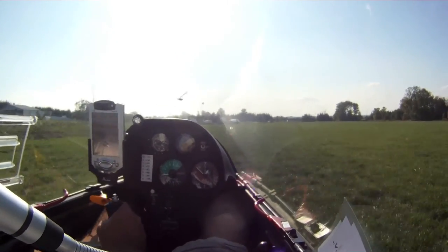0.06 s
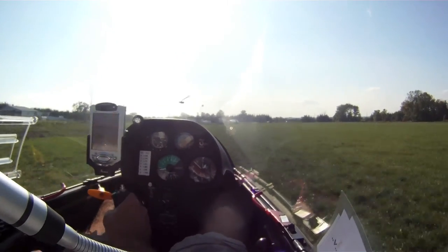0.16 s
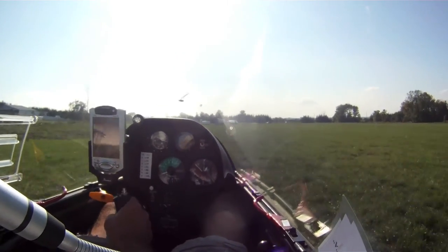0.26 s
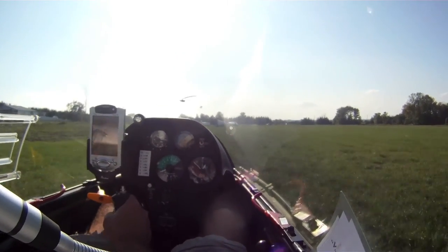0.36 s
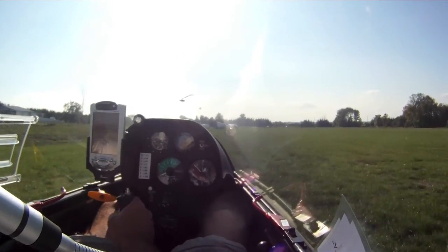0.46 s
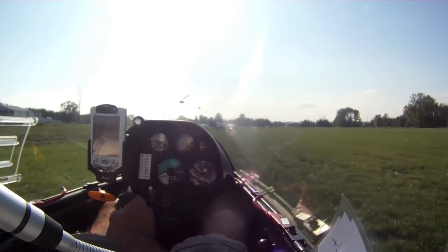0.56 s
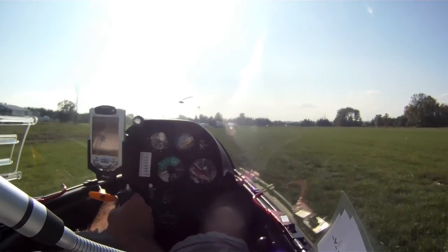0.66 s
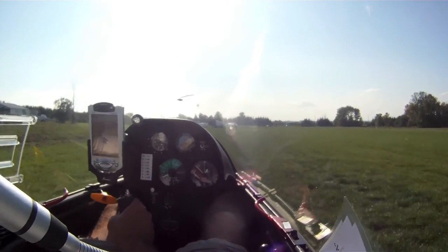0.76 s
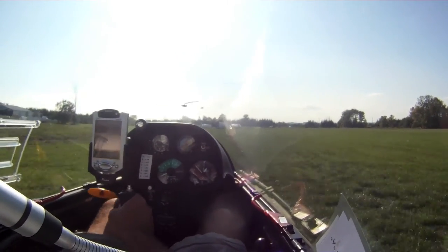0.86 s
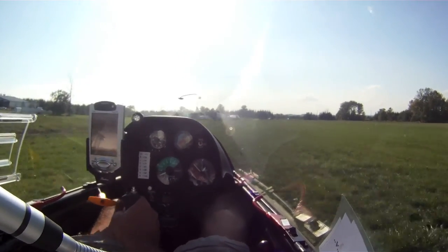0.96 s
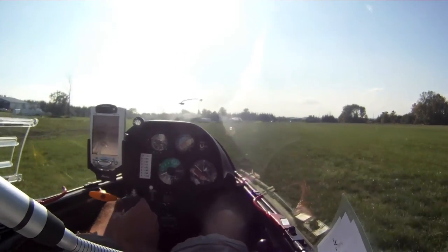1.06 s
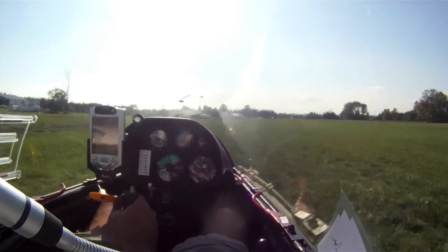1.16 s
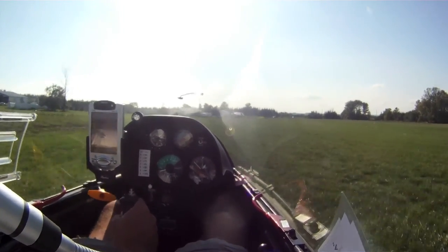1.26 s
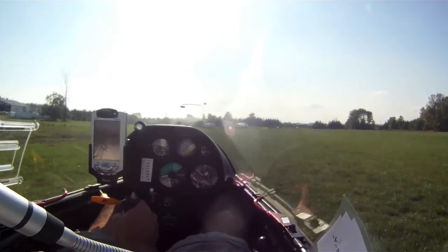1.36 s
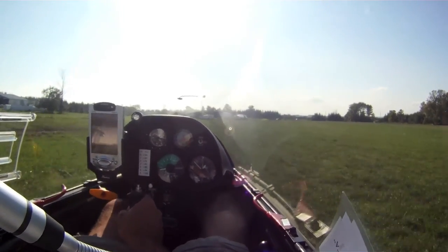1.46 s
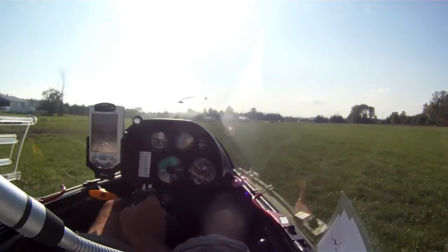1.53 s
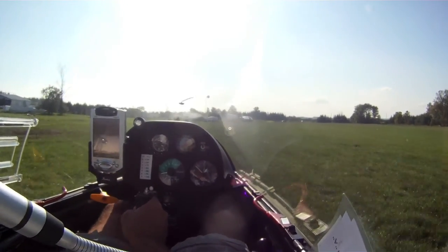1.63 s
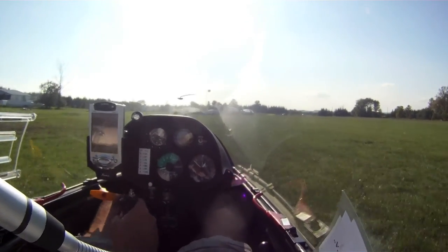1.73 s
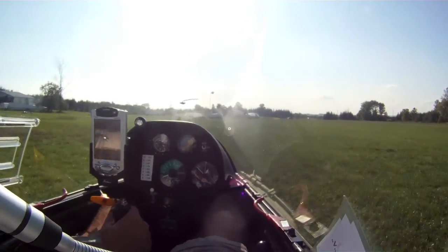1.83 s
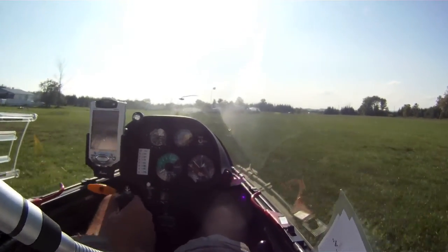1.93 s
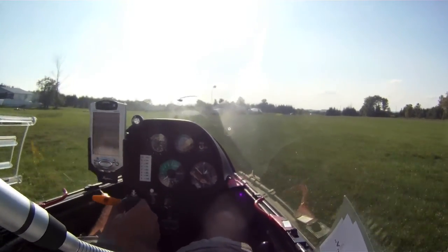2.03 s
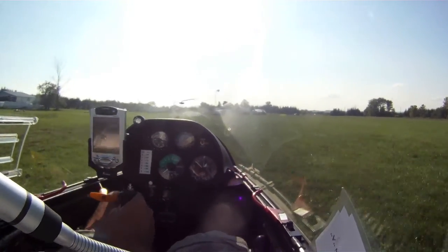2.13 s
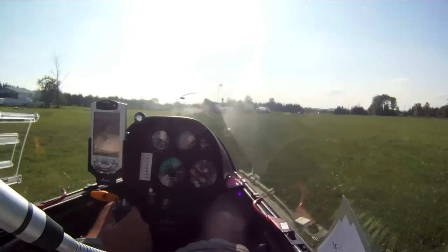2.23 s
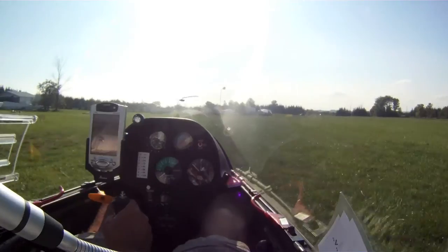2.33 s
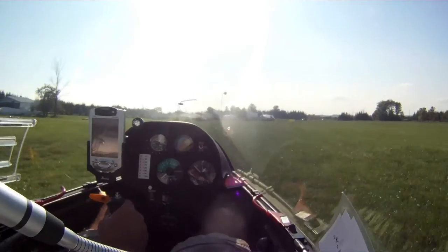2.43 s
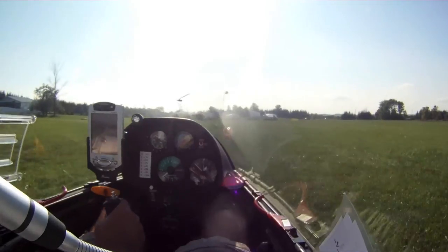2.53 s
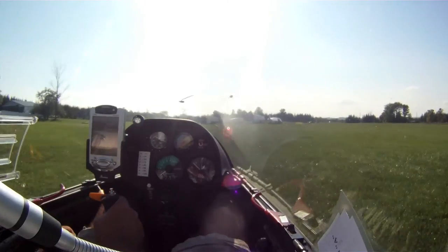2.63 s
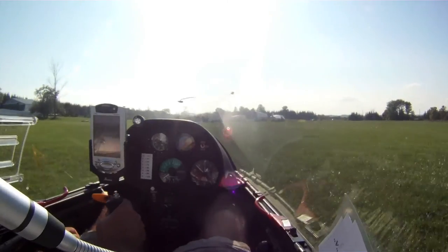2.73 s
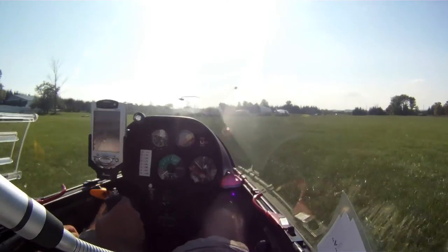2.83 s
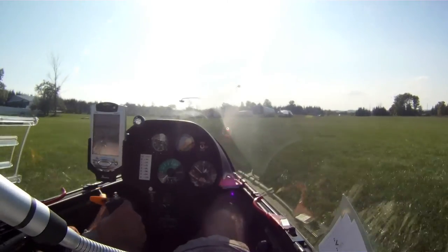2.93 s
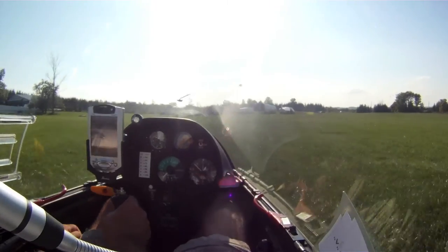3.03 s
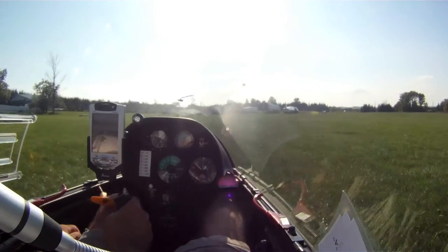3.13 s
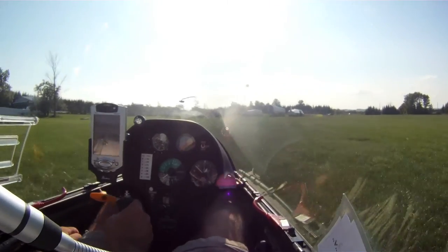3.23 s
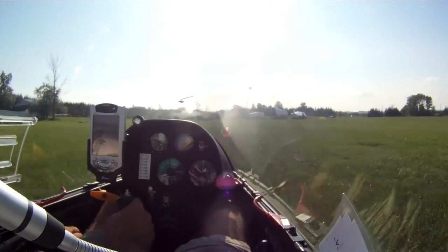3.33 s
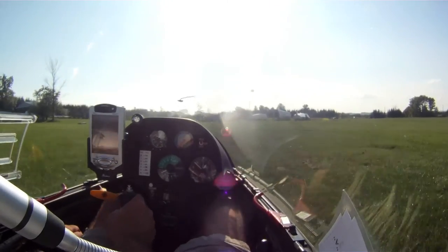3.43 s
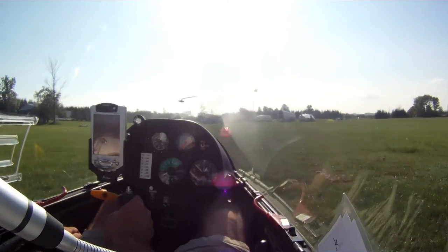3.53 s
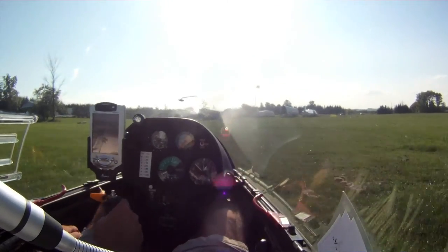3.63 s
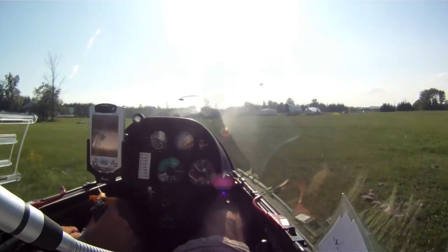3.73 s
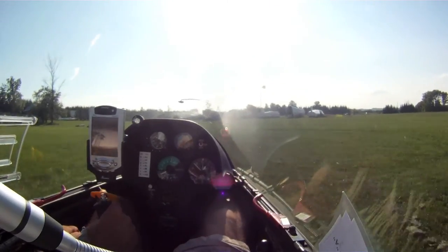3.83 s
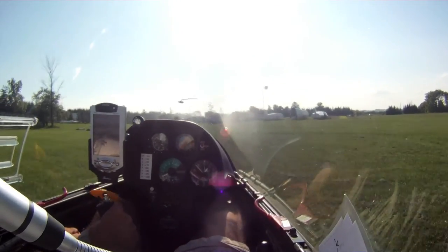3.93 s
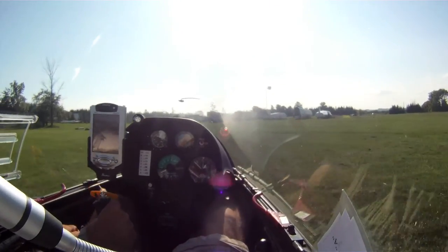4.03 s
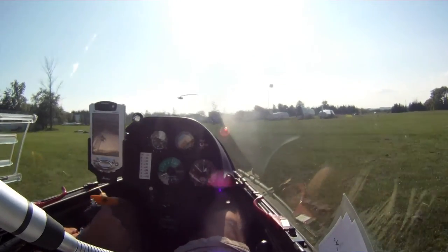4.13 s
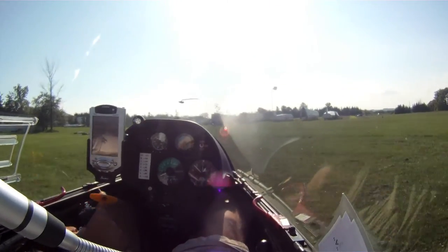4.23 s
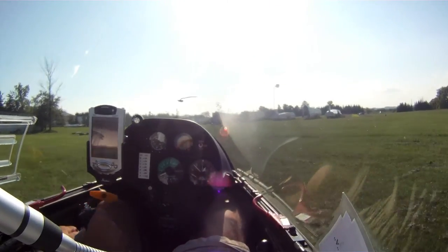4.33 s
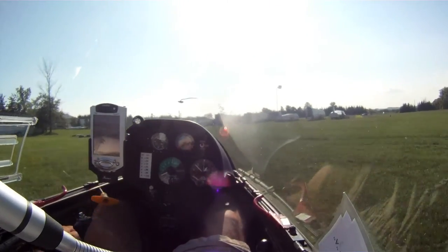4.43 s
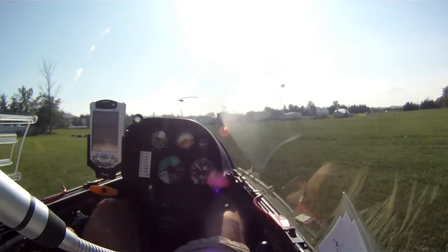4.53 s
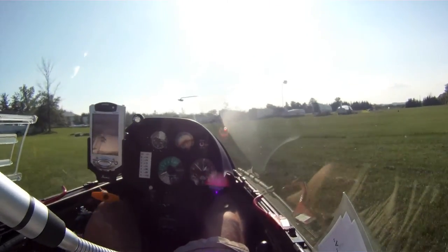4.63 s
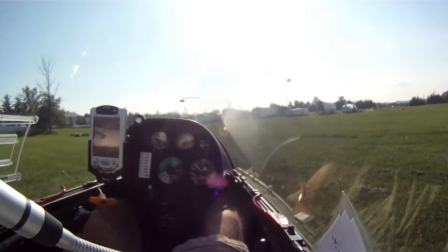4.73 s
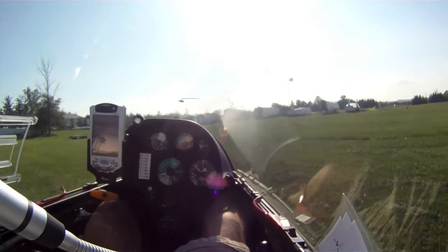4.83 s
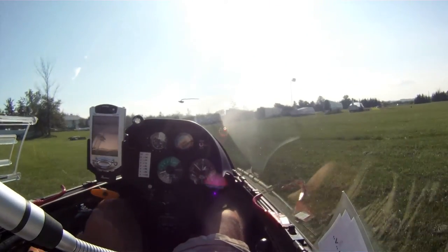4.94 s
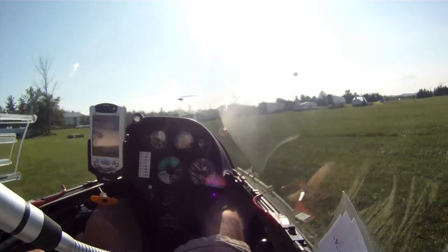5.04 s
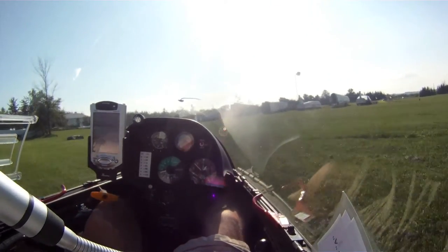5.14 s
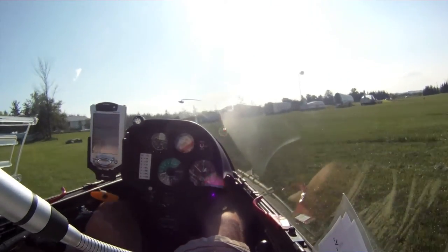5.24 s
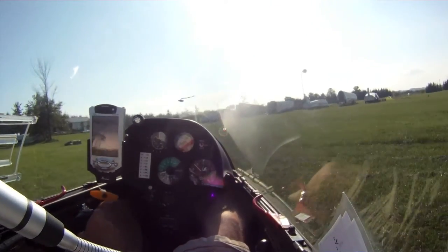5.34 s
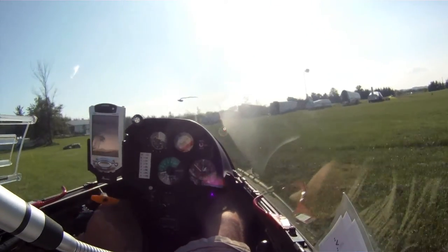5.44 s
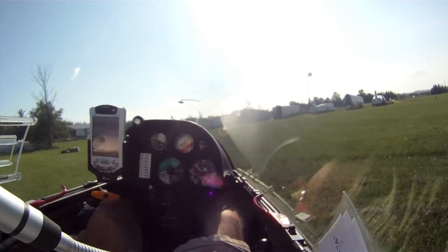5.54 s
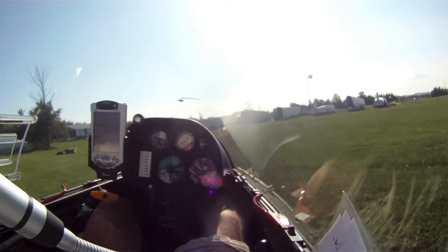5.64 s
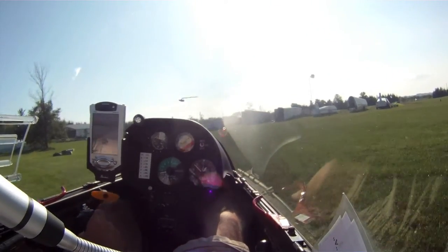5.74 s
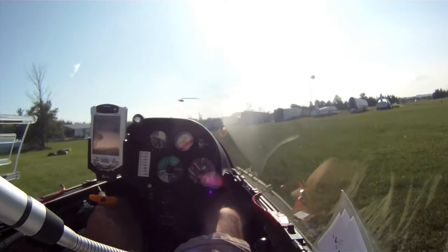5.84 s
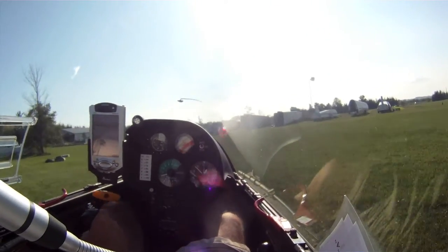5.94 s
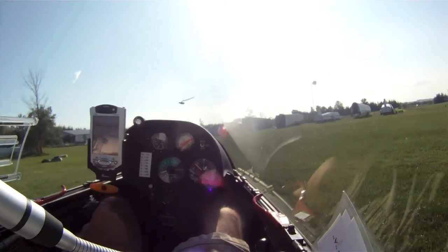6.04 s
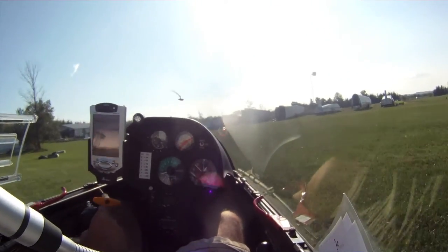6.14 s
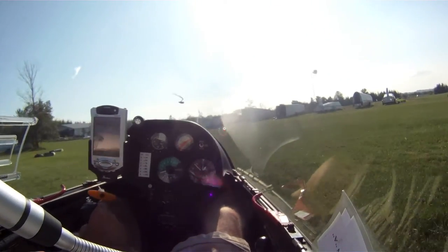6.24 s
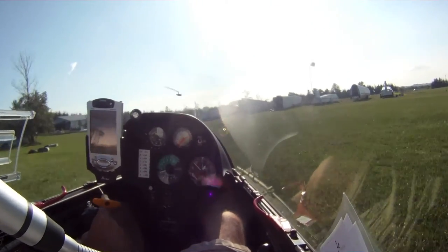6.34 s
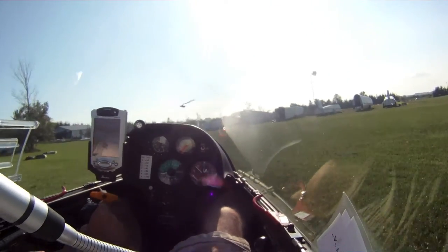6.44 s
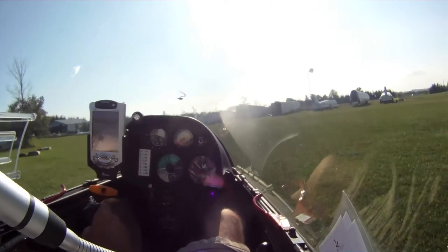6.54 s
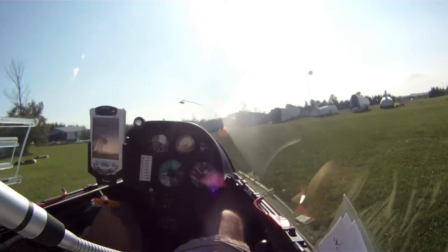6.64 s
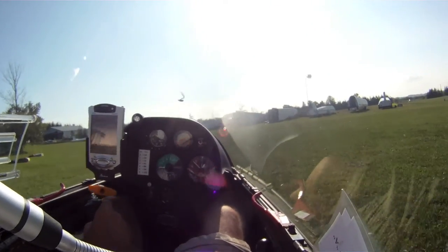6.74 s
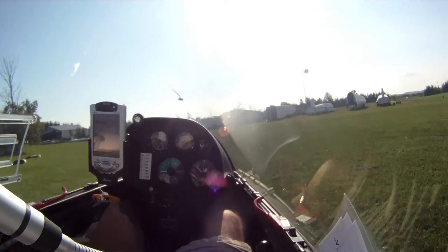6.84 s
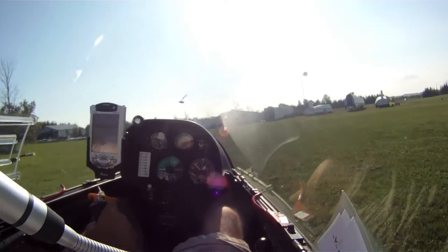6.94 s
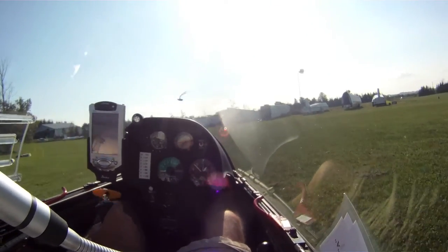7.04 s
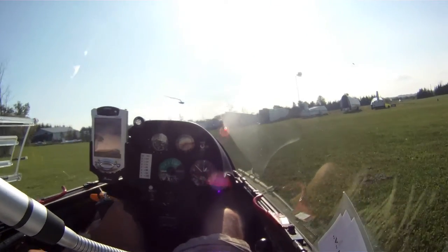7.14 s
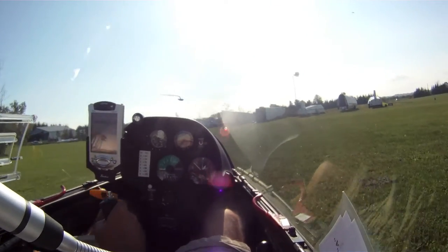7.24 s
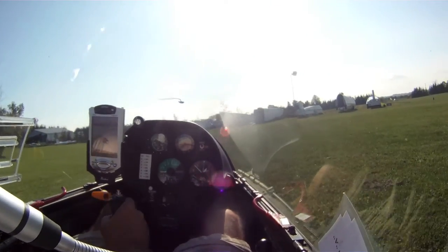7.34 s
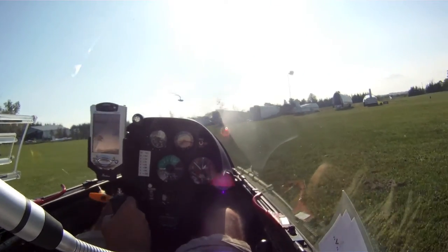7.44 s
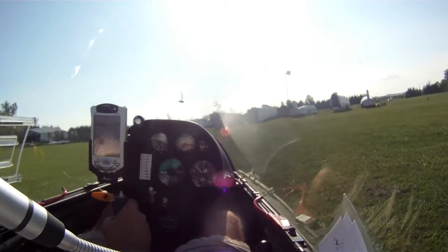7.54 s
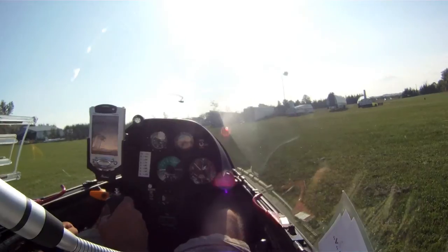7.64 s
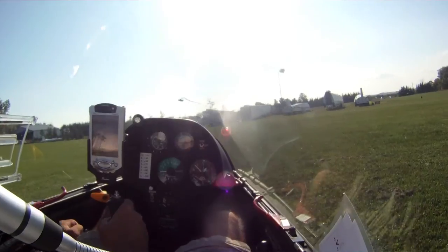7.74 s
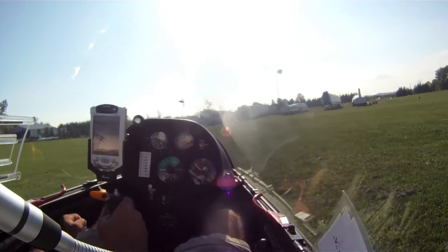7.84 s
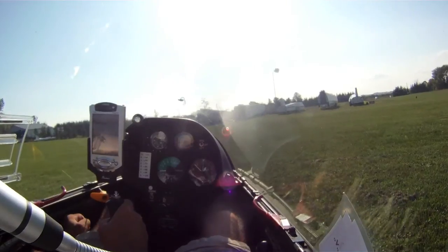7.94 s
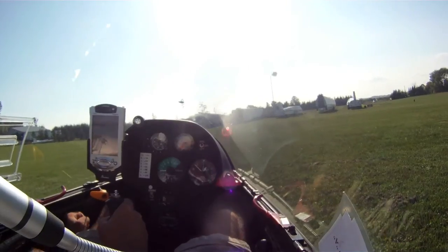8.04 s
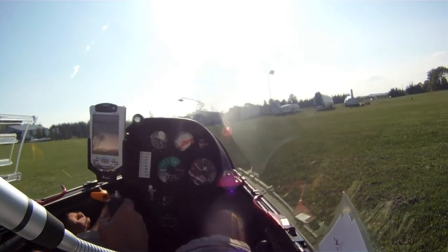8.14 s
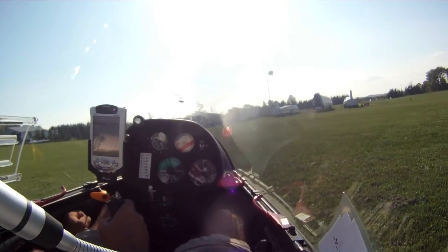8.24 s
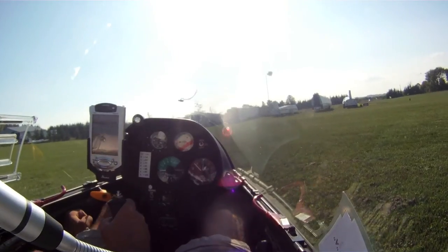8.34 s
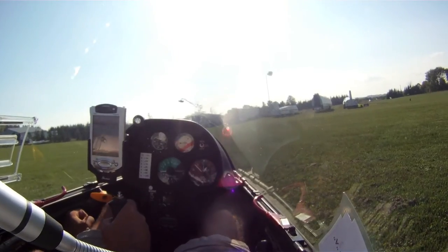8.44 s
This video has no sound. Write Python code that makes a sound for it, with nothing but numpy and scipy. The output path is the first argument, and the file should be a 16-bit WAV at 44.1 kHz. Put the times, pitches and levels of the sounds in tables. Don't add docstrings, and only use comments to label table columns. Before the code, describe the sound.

Close, muffled and dry inside a glider cockpit rolling over grass, through a small camera in a closed case on the airframe. From 0 to 2.5 seconds a low, uneven hull boom throbs quickly over turf rumble, with heavy wheel thumps, hollow panel rattles, small bright pings and chattering ticks; an especially hard crack and jolt land near 1.9. From 2.5 to 5 the rumble eases but the boom keeps swelling, panel knocks and loose ticks stand out, with a thump near 4.2. A sharp clack comes at 5.1. The boom then sinks and ticks fall into short regular runs as the wing rocks. At 6.3 to 6.6 the wingtip judders rapidly, slowing and weakening. After 7 the rumble nearly vanishes; faint grass brushing fades, and isolated soft knocks and creaks around 7.5, 8.0 and 8.4 close it.

```python
import sys
import numpy as np
from scipy import signal
from scipy.fft import rfft, irfft, next_fast_len
from scipy.io import wavfile
from scipy.ndimage import uniform_filter1d

SR = 44100
rng = np.random.default_rng(int(sys.argv[2]) if len(sys.argv) > 2 else 0)


def waveform_to_disk(signal):
    frames = np.transpose(np.atleast_2d(signal))
    scaled = np.clip(frames, -1, 1) * 32767
    samples = np.round(scaled).astype(np.int16)
    wavfile.write(sys.argv[1], SR, samples)


def attenuation_scalar(level_db):
    decades = np.asarray(level_db, float) / 20
    return 10 ** decades


N = 374409
TIME = np.arange(N) / SR


def level(x, db=0):
    return x * attenuation_scalar(db) / np.sqrt(np.mean(x ** 2))


def curve(table):
    return np.interp(TIME, *np.transpose(table))


def walk(rate_hz):
    hold = int(SR / rate_hz)
    steps = np.repeat(rng.standard_normal(N // hold + 1), hold)
    return level(uniform_filter1d(uniform_filter1d(steps, hold), hold)[:N])


def coloured(spectrum):
    hz, db = np.transpose(spectrum)
    size = next_fast_len(N)
    bins_hz = np.arange(1, size // 2 + 2) * SR / size
    gain = attenuation_scalar(np.interp(np.log(bins_hz), np.log(hz), db))
    return level(irfft(rfft(rng.standard_normal(size)) * gain, size)[:N])


def ring(x, modes):
    out = 0
    for k, (hz, width_hz, db) in enumerate(modes):
        b, a = signal.iirpeak(hz, hz / width_hz, SR)
        out = out + (-1) ** k * attenuation_scalar(db) * signal.lfilter(b, a, x)
    return out


def bursts(starts, peaks_db, fades_s, rise_s):
    out = np.zeros(N)
    for s, db, fade in np.broadcast(starts, peaks_db, fades_s):
        t = np.arange(int(max(fade, 1e-3) * SR)) / SR
        i = int(s * SR)
        blow = attenuation_scalar(db - 60 * t / fade) * (1 - np.exp(-t / rise_s))
        out[i:i + len(t)] += blow[:N - i]
    return out


def struck(envelope, modes, starts=(), peaks_db=()):
    noise = rng.standard_normal(N)
    blows = np.zeros(N)
    blows[(np.asarray(starts) * SR).astype(int)] = attenuation_scalar(peaks_db)
    one_blow = ring(np.arange(4000) == 0, modes)
    shaking = envelope * noise / np.std(ring(noise[:SR], modes))
    return ring(shaking + blows / np.abs(one_blow).max(), modes)


def swells(rest_db, crests, peaks_db, builds_s, fades_s):
    coarse = TIME[::64]
    t = coarse[:, None] - crests
    drop_db = 20 * np.where(t < 0, -t / builds_s, t / fades_s)
    power = attenuation_scalar(2 * (peaks_db - drop_db)).sum(axis=1)
    return 10 * np.log10(np.interp(TIME, coarse, power) + attenuation_scalar(2 * rest_db))


# start_s, speed_m_s
SPEED = [(0, 9), (1.0, 8), (2.1, 8), (3.0, 5), (4.0, 4), (5.0, 3.2), (6.2, 2.2), (7.0, 1.8), (7.45, .9),
         (8.05, .7), (8.25, .3), (8.49, .22)]


def follow_speed(full_db, exponent):
    return full_db + exponent * 20 * np.log10(curve(SPEED) / 9)


def patchy(rest_db, patches):
    s, db, fade_s = patches
    return swells(rest_db, s, db, fade_s, fade_s)


# pitch_hz, level_db
FLOOR = [(35, -31), (60, -1), (117, -7), (323, -27), (473, -26), (925, -13), (1230, -37), (2230, -35),
         (5800, -48), (7540, -78), (12800, -120)]


def still_air():
    return coloured(FLOOR) * attenuation_scalar(-71)


# pitch_hz, level_db
SWISH = [(650, -20.5), (1100, 1), (1180, -8), (1270, 5.5), (1770, -33.5), (2030, -7), (2330, -7.5),
         (3060, -25), (3720, -1), (4150, -17.5), (4710, -10), (5410, -16), (5800, -22.5), (7540, -57),
         (12800, -120)]
# start_s, level_db
ROLLING = [
    (0, 0),
    (7.75, 0),
    (8.1, -14),
    (8.49, -25),
]


def grass(rolling, loose_db):
    brush_db = np.maximum(loose_db, -74) - 11 + 2.5 * walk(120)
    return rolling * coloured(SWISH) * attenuation_scalar(brush_db)


# pitch_hz, width_hz, level_db
SWAY = [(31.5, 9.43, 2), (56, 15, -8.5)]
# start_s, level_db, fade_s (20 dB either side)
DIPS = [(0.17, -47, .4), (0.8, -45, .35), (1.15, -52, .7), (1.88, -38, .3), (2.3, -40, .5), (2.75, -45, .9),
        (3.3, -48, .9), (3.98, -53, .8), (4.8, -52, .6), (5.65, -49, .7), (6.55, -48, .5), (8.05, -61, .3)]


def suspension():
    sway_db = patchy(follow_speed(-51, .75), np.transpose(DIPS)) + 1.5 * walk(5)
    return struck(attenuation_scalar(sway_db), SWAY)


# pitch_hz, level_db
TURF = [(56, -33.5), (95, -3), (129, -1), (265, -19), (344, -23.5), (461, -22.5), (520, -21.5), (680, -49),
        (1140, -120)]
# start_s, fade_s (20 dB either side), rattle_db of panels, rumble_db of turf
PATCHES = [(0.0, .4, -51, -44), (0.42, .3, -50, -53), (0.8, .3, -48.5, -43), (1.05, .6, -54, -50),
           (1.5, .6, -53, -46), (1.25, .3, -58, -47), (1.72, .4, -60, -46.5), (1.92, .25, -62, -46.5),
           (2.08, .15, -55, -46.5), (2.38, .3, -54.5, -56), (2.47, .1, -58, -53), (2.64, .2, -49.5, -59),
           (2.75, .6, -54, -51), (3.2, .8, -60, -51), (3.51, .3, -49, -50.5), (3.65, .5, -52, -57),
           (4.16, .18, -47.5, -56), (4.47, .3, -51, -53), (4.65, .7, -52.5, -57), (4.91, .7, -56.5, -62),
           (5.15, .3, -58, -53), (5.29, .4, -56, -58), (5.64, .4, -55.5, -55), (6.03, .4, -53.5, -60),
           (6.33, .4, -63, -52), (6.8, .35, -57, -59), (7.0, .3, -62, -57), (7.25, .4, -62, -62),
           (7.59, .5, -65, -68), (7.97, .3, -68, -61), (0.66, .2, -52, -62), (1.85, .15, -55, -52),
           (6.45, .2, -57, -60), (3.45, .2, -58, -51)]


def rough_turf():
    s, fade_s, panel_db, ground_db = np.transpose(PATCHES)
    rattle_db = patchy(follow_speed(-62, .6), (s, panel_db, fade_s))
    turf_db = patchy(follow_speed(-56.5, 1.05), (s, ground_db, fade_s))
    return coloured(TURF) * attenuation_scalar(turf_db + 2.6 * walk(25)), rattle_db


# start_s, level_db
SLACK = [(0, 0), (.9, -1.5), (1.9, -1.5), (2.35, 2.5), (2.75, -1), (2.92, 4.5), (3.15, 0), (3.35, 4),
         (3.7, 1.5), (3.85, 4), (4.05, .5), (5.05, -2), (5.22, 3), (5.45, -1), (6.05, -1.5), (6.27, 3),
         (6.45, -1.5), (7.3, -2)]


def looseness(boom_db, rattle_db):
    from_boom = .5 * (np.maximum(boom_db, -55) + 42)
    from_rattle = .15 * (rattle_db + 55)
    return follow_speed(-66.5, .42) + from_boom + from_rattle + curve(SLACK)


# start_s, length_s, level_db
ROCKING = [(5.557, .06, -55), (5.68, .06, -57.5), (5.741, .02, -56), (5.822, .14, -55.5), (6.002, .02, -63),
           (6.058, .3, -57), (6.415, .51, -56.5), (6.92, .06, -55), (7.0415, .06, -56.5), (7.196, .06, -60),
           (7.292, .02, -54), (7.331, .1, -61.5), (7.535, .06, -61), (7.663, .06, -62.5), (7.733, .02, -71)]


def repeats(start_s, length_s, period_s):
    return start_s + np.arange(0, length_s, period_s)


def rocking():
    times, levels_db = [], []
    for start, length_s, db in ROCKING:
        t = repeats(start, length_s, .0408)
        times.append(t)
        levels_db.append(db - 10 * (t - start))
    s, db = np.concatenate(times), np.concatenate(levels_db)
    chance = rng.standard_normal((2, len(s)))
    return s + .002 * chance[0], db + 2.0 * chance[1]


# pitch_hz, width_hz, level_db
FITTING = [(2140, 700, -5), (3790, 135, 0), (3310, 300, -8), (4650, 590, -5.5), (5366, 660, -6.5)]
# start_s, level_db
TICKS = [(0.0682, -53), (0.2027, -49), (0.6146, -50), (0.9324, -55), (1.3814, -52), (1.719, -50),
         (1.8647, -53), (1.8941, -42), (1.9747, -52.5), (2.6492, -53), (2.6753, -51.5), (2.7555, -50.5),
         (2.875, -53.5), (3.032, -53), (3.2665, -55), (3.9714, -54), (4.0891, -51), (4.4633, -49.5),
         (4.4907, -53), (4.7237, -53), (4.8296, -50.5), (5.1053, -48), (5.122, -54), (5.187, -53),
         (7.237, -58), (5.3906, -61), (5.483, -53.5), (5.9628, -55.5), (6.3679, -56), (6.4542, -52),
         (6.5902, -54), (6.7071, -55), (7.133, -57), (0.3641, -51), (0.7352, -52), (1.1817, -52),
         (2.384, -52), (2.3965, -50), (2.4583, -53), (2.7267, -53), (3.8806, -52), (3.9365, -56),
         (4.142, -52), (5.1467, -54), (5.3298, -57), (5.4105, -56), (5.4335, -57), (3.293, -54),
         (3.305, -54), (3.331, -56)]
# start_s, level_db
CRACKS = [(0.934, -48), (1.3823, -48), (1.893, -37), (1.8954, -34), (1.9775, -36.5), (5.1048, -46),
          (5.113, -51), (6.4532, -40)]


def fitting(crests, loose_db):
    chatter_ends_s = 7.3
    crests = crests[crests < chatter_ends_s]
    chance = rng.standard_normal((4, len(crests)))
    landing_s = crests + .0012 * chance[0]
    skip_s = crests + .005 + .002 * chance[1]
    s = np.abs(np.r_[landing_s, skip_s])
    force_db = np.r_[9.5 + 2.4 * chance[2], 4.0 + 3.5 * chance[3]]
    chatter = s, loose_db[(s * SR).astype(int)] + force_db

    slow_s, slow_db = rocking()
    chance = rng.standard_normal((2, len(slow_s)))
    rebound_db = slow_db - 6.0 - 9.0 * (slow_s > chatter_ends_s) + 3.0 * chance[1]
    rebounds = slow_s + .009 + .003 * chance[0], rebound_db

    s, db = np.hstack([chatter, np.transpose(TICKS), (slow_s, slow_db), rebounds])
    ticks = struck(bursts(s, db - 3.5, .021, rise_s=.0002), FITTING, s, db + 1.8)
    cracks = struck(0, [(3300, 520, 0), (4540, 1200, -8)], *np.transpose(CRACKS))
    return ticks + cracks


# start_s, level_db, pitch_hz
PINGS = [(0.0263, -50, 2290), (0.0667, -47, 2340), (0.1266, -45, 2280), (0.2179, -50, 1950),
         (0.2713, -51, 2100), (0.6843, -53, 2240), (0.8106, -47, 2260), (0.8435, -54, 1950),
         (0.9318, -42, 2260), (1.2516, -48, 2060), (1.3224, -47, 2140), (1.3897, -54, 2060),
         (1.4087, -51, 2010), (1.4351, -50, 2280), (1.6651, -51, 2020), (1.7015, -48, 1950),
         (1.8876, -40, 2150), (1.9659, -55, 2320), (2.1101, -48, 2240), (2.1685, -58, 1990),
         (2.2563, -46, 2170), (2.4139, -50, 1930), (2.4593, -48, 1980), (2.603, -51, 1640),
         (3.0081, -52, 2070), (3.2695, -50, 2510), (3.3508, -52, 1620), (3.5089, -52, 1630),
         (3.6366, -51, 2030), (3.7913, -53, 2020), (3.8297, -49, 2080), (4.0487, -53, 2480),
         (4.1674, -48, 2500), (4.3914, -57, 2120), (4.4204, -51, 1630), (4.815, -52, 2010),
         (5.1053, -43, 1990), (5.5258, -52, 1980), (5.5837, -53, 1970), (5.6645, -55, 2200),
         (5.8217, -54, 2200), (6.0581, -50, 1980), (6.1893, -58, 2090), (6.2637, -56, 2160),
         (6.2746, -51, 1930), (6.342, -53, 1690), (6.4383, -56, 1930), (6.8269, -52, 2020),
         (7.1352, -50, 2060), (7.2938, -57, 2250)]


def pings():
    out = np.zeros(N)
    t = np.arange(2000) / SR
    for s, db, hz in PINGS:
        i = int(s * SR)
        envelope = attenuation_scalar(db + 4.5 - 60 * t / .014) * (1 - np.exp(-t / .0006))
        out[i:i + len(t)] += envelope * np.sin(2 * np.pi * hz * t)
    return out


# pitch_hz, width_hz, level_db
PANELS = [(568, 76, 3.8), (638, 42, 11), (766, 130, 5.4), (898, 78, 10.6), (954, 157, 9.5), (1087, 170, 1)]
# pitch_hz, width_hz, level_db
EDGE = [(1280, 400, -10), (1635, 60, -6.5), (2530, 415, -4), (2006, 430, -3.5)]
# start_s, level_db
KNOCKS = [(0.166, -44), (0.219, -37.5), (0.27, -40.5), (0.415, -45), (0.753, -41), (0.792, -39),
          (1.025, -42), (1.532, -39.5), (1.124, -45), (2.601, -39), (2.752, -41), (2.982, -39),
          (3.013, -43.5), (3.103, -43), (3.265, -40), (3.349, -39), (3.397, -43.5), (3.467, -42),
          (3.488, -38.5), (3.71, -44.5), (3.831, -40.5), (3.914, -39.5), (4.1, -42.5), (4.392, -45),
          (4.418, -42), (4.538, -43), (4.634, -44.5), (4.76, -45), (4.905, -44.5), (4.991, -45),
          (0.343, -44), (0.439, -44), (0.544, -49), (0.593, -44), (2.077, -45), (2.207, -50), (3.312, -47),
          (3.451, -47), (3.944, -46), (3.989, -48), (4.048, -48), (4.49, -45),
          (5.104, -33.5), (5.184, -40), (5.229, -48), (5.27, -41.5), (5.382, -41), (5.44, -46),
           (5.525, -40), (5.668, -40.5), (5.821, -40.5), (5.865, -45), (6.057, -42.5), (6.192, -42),
           (6.264, -43), (6.339, -44), (6.387, -50), (6.825, -45), (6.977, -47), (6.992, -45), (6.278, -42),
           (6.594, -51), (6.943, -48), (7.137, -43), (7.237, -52), (7.269, -54)]
# start_s, level_db
SETTLING = [(7.544, -53), (7.793, -50), (7.816, -53.5), (7.982, -45), (8.017, -53), (8.137, -60),
            (8.372, -61), (8.081, -48), (8.187, -50), (8.303, -57.5), (8.327, -63), (8.423, -45.5),
            (8.467, -46.5)]


def panels(rattle_db, rolling):
    s, db = np.transpose(KNOCKS + SETTLING)
    s = s - .002
    knocks = bursts(s, db - 4.5, 0.07 * attenuation_scalar(0.54 * (db + 37)), rise_s=.0015)
    rattle = attenuation_scalar(rattle_db - 1.5 + 1.4 * walk(30) + 2.6 * walk(110))
    body = struck(rattle + knocks, PANELS, s, db + 2.5)
    body = signal.sosfilt(signal.butter(2, 460, btype="high", fs=SR, output="sos"), body)
    body = signal.sosfilt(signal.butter(8, 1220, fs=SR, output="sos"), body)
    shaken = attenuation_scalar(-14.5) * rolling ** 0.21 * knocks + attenuation_scalar(-17) * rolling * rattle
    ping_s, ping_db, _ = np.transpose(PINGS)
    ping_hits = bursts(ping_s, ping_db - 6.0, 0.03, rise_s=0.0012)
    return body + pings() + struck(ping_hits + shaken, EDGE)


def judder():
    since = repeats(0, .3, .0195)
    back = np.arange(len(since)) % 2 == 0
    chance = rng.standard_normal((2, len(since)))
    stops = 6.2995 + since + .18 * since ** 2 + .0012 * chance[0]
    db = -37 - 11 * since - 1.0 * back + 1.6 * chance[1]
    return stops, db, 1 - 2 * back


# start_s, level_db,
# direction (1 or -1)
BUMPS = [(0.0661, -34.5, 1), (0.7095, -41, 1), (0.7692, -32, -1), (0.9335, -35.5, 1), (1.3516, -34.5, 1),
         (1.3928, -34, 1), (1.4964, -37, 1), (1.701, -34.5, 1), (1.7398, -38, 1), (1.7801, -35, 1),
         (1.8895, -38.5, -1), (1.9053, -30, 1), (2.0911, -38, 1), (2.1097, -30, 1), (2.3053, -37.5, 1),
         (2.3994, -36, 1), (2.421, -40.6, 1), (2.4409, -35.5, -1), (2.4564, -42, -1), (2.4912, -40, 1),
         (2.6588, -37, -1), (2.6734, -37, 1), (2.6885, -40, -1), (4.1323, -42, 1), (4.1811, -31.5, 1),
         (5.108, -42, -1), (5.1509, -38.5, 1), (6.3014, -34, -1), (6.3445, -32, 1), (6.7749, -45, 1),
         (6.632, -50, 1), (6.654, -48, 1), (6.678, -51, 1), (6.868, -49, 1), (6.944, -51, 1),
         (3.105, -37, -1), (0.085, -37, 1), (0.119, -38, -1), (0.181, -38, -1), (0.337, -42, 1),
         (0.357, -47, -1), (0.95, -39, 1), (1.037, -41, 1), (1.229, -37, -1), (1.292, -38, 1),
         (1.667, -40, -1), (1.685, -41, 1), (1.921, -42, 1), (2.026, -42, -1), (2.048, -41, -1),
         (2.258, -42, -1), (2.291, -42, -1), (2.786, -43, 1), (3.54, -43, -1), (3.853, -44, -1),
         (3.917, -48, 1), (5.133, -44, -1), (5.312, -48, -1), (6.099, -50, 1), (7.321, -58, -1)]


def bumps():
    t = np.arange(-400, 2000) / SR
    load = np.exp(-(t / 0.0013) ** 2) - 0.19 * np.exp(-((t + 0.0054) / 0.0014) ** 2)
    swing_back = np.cos(2 * np.pi * 85 * t) * np.exp(-t / 0.0044)
    jolt = np.where(t < 0, load, swing_back)
    s, db = np.transpose(SETTLING)
    thuds = s, db - 19, np.ones(len(s))
    s, db, direction = np.hstack([np.transpose(BUMPS), judder(), thuds])
    blows = np.zeros(N)
    blows[(s * SR).astype(int)] = np.sign(direction) * attenuation_scalar(db + 6.0)
    return signal.fftconvolve(blows, jolt)[400:N + 400]


# start_s (of the crest), level_db, build_s and fade_s (20 dB each)
SWELLS = [(0.0, -36.5, .1, .13), (0.17, -40, .08, .6), (0.44, -37, .3, .35), (0.65, -39.5, .15, .5),
          (1.03, -40, .6, .12), (1.15, -40, .15, .5), (1.27, -40, .3, .17), (1.53, -39, .16, .13),
          (1.68, -38, .2, .2), (1.89, -42, .18, .2), (1.99, -40, .15, .07), (2.1, -41, .05, .05),
          (2.23, -46, .08, .06), (2.41, -38, .14, .24), (2.77, -38, .24, .55), (3.05, -38, .12, .2),
          (3.28, -38.5, .28, .08), (3.44, -45, .07, .3), (3.67, -36.5, .09, .38), (3.88, -36, .2, .1),
          (4.25, -36, .55, .16), (4.46, -38.8, .07, .8), (5.05, -47, .9, .3), (5.17, -35.5, .12, .45),
          (5.56, -41, .25, .25), (5.78, -42, .8, .42), (6.33, -48, .2, .9), (6.57, -42, .3, .14),
          (6.78, -46, .2, .09), (7.1, -54, .5, .4), (0.75, -40, .08, .1), (1.77, -40, .08, .08),
          (4.17, -37, .15, .1), (5.98, -46, .2, .15), (6.38, -41, .12, .2), (6.93, -50, .15, .1)]


def boom_level():
    return swells(follow_speed(-56, 1.1), *np.transpose(SWELLS))


def hull(boom_db):
    turns = np.cumsum(77.2 + 3.5 * walk(35)) / SR
    swing = np.sqrt(2) * attenuation_scalar(boom_db + 1.4 * walk(30))
    crests = np.flatnonzero(np.diff(np.floor(turns - .2))) / SR
    return swing * np.sin(2 * np.pi * turns), crests


def scene():
    rolling = attenuation_scalar(curve(ROLLING))
    boom_db = boom_level()
    turf, rattle_db = rough_turf()
    loose_db = looseness(boom_db, rattle_db)
    boom, crests = hull(boom_db)
    background = still_air() + grass(rolling, loose_db) + suspension() + turf
    cockpit = fitting(crests, loose_db) + panels(rattle_db, rolling)
    return (background + cockpit + bumps() + boom)[None]


def roll_off(x):
    return signal.sosfilt(signal.butter(12, 15740, fs=SR, output="sos"), x)


def record(dry):
    limit_db, depth, release_s = -29, 3.6, 0.013
    over = np.clip(np.abs(np.roll(dry, 130)) / attenuation_scalar(limit_db) - 1, 0, None)
    keep = np.exp(-1 / (release_s * SR))
    ducked = dry / (1 + depth * 10 * signal.lfilter([1 - keep], [1, -keep], over))
    guarded = signal.sosfilt(signal.ellip(6, .3, 40, 5690, fs=SR, output="sos"), ducked)
    slow_times = np.arange(0, N, SR / 12000)
    slow = np.array([np.interp(slow_times, np.arange(N), v) for v in guarded])
    held = signal.resample_poly(np.repeat(slow, 4, axis=1), 147, 160, axis=1)[:, :N]
    smooth = signal.sosfilt(signal.butter(3, 14500, fs=SR, output="sos"), held)
    finished = signal.sosfilt(signal.ellip(8, .2, 60, 15420, fs=SR, output="sos"), smooth)
    return roll_off(finished)


dry = scene()
out = record(dry)
waveform_to_disk(out)
```